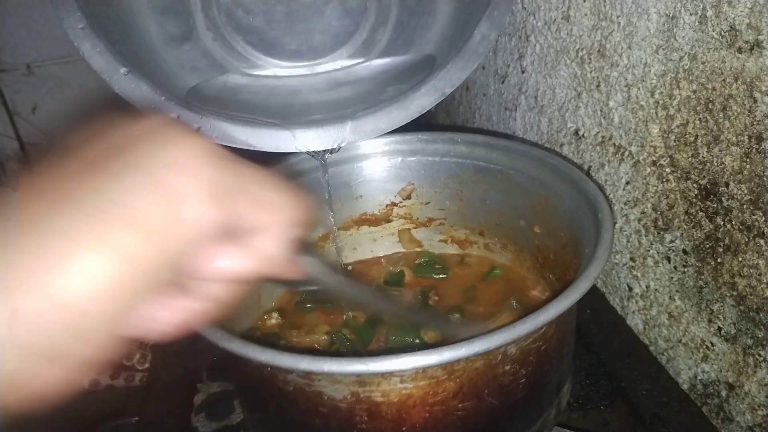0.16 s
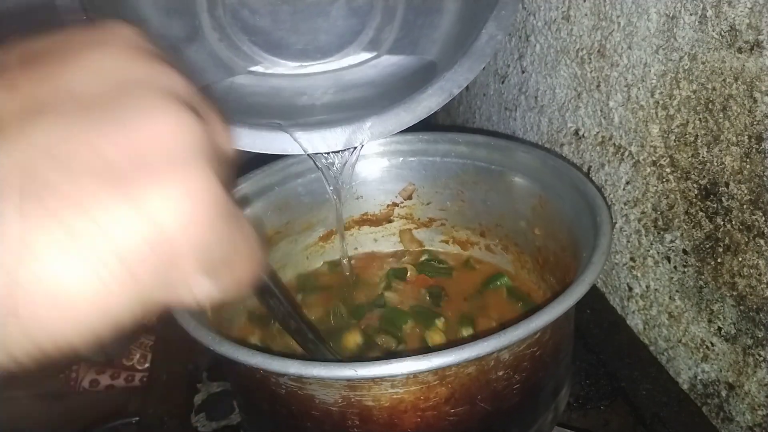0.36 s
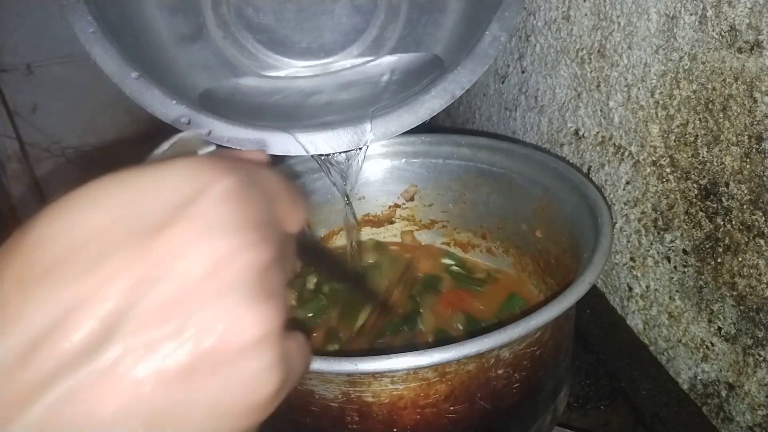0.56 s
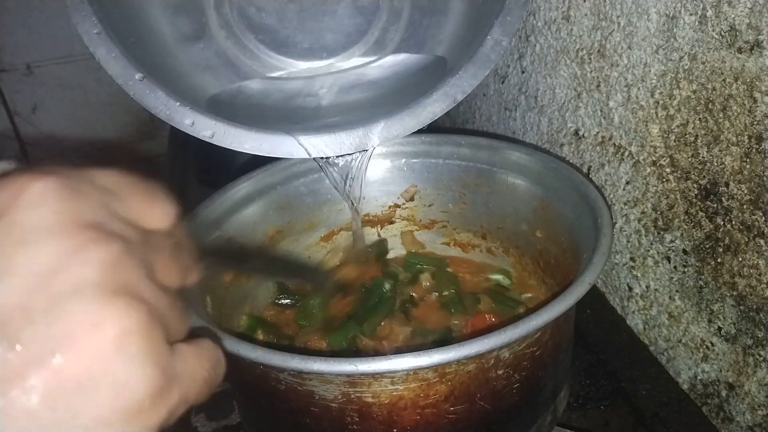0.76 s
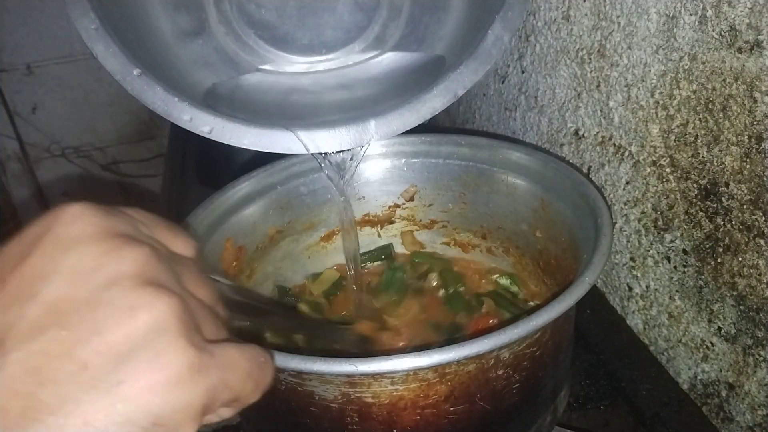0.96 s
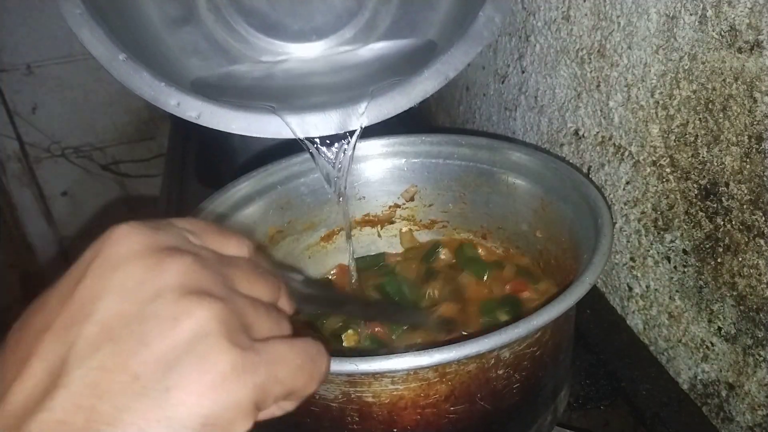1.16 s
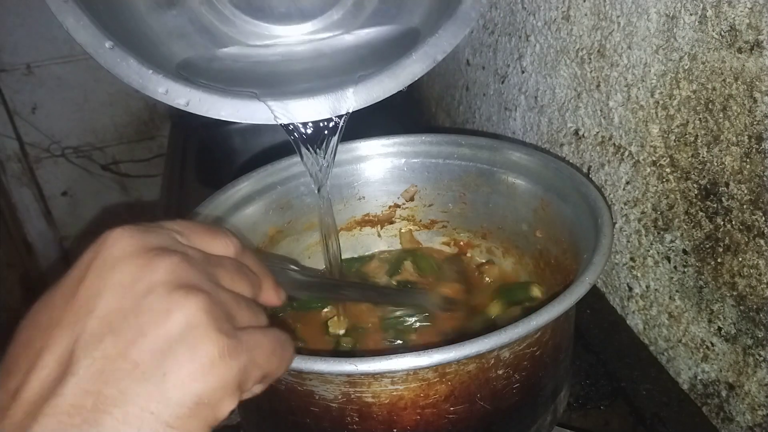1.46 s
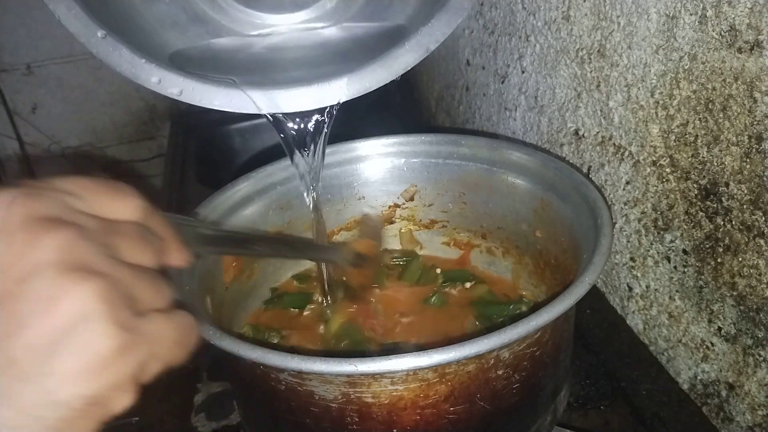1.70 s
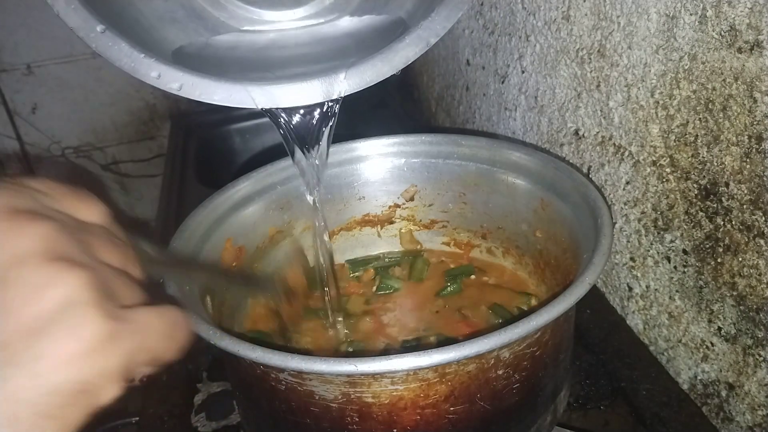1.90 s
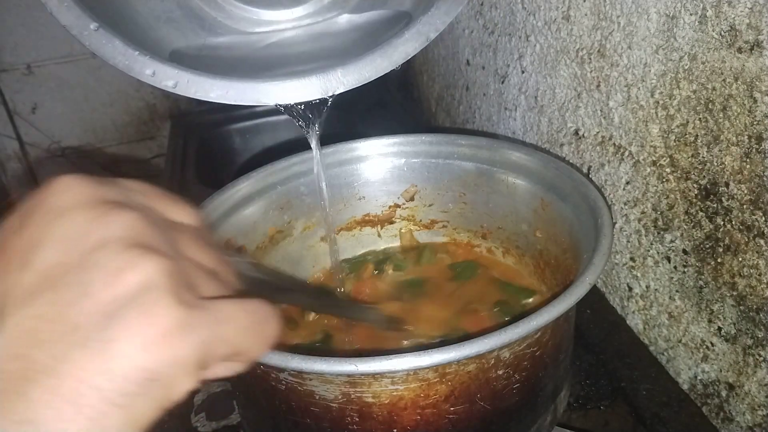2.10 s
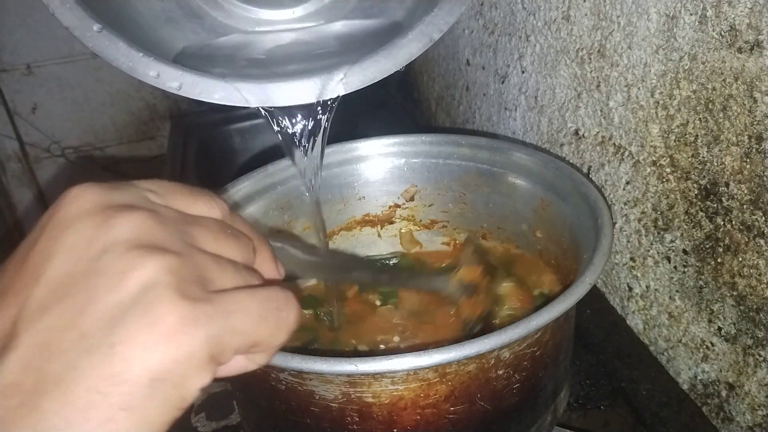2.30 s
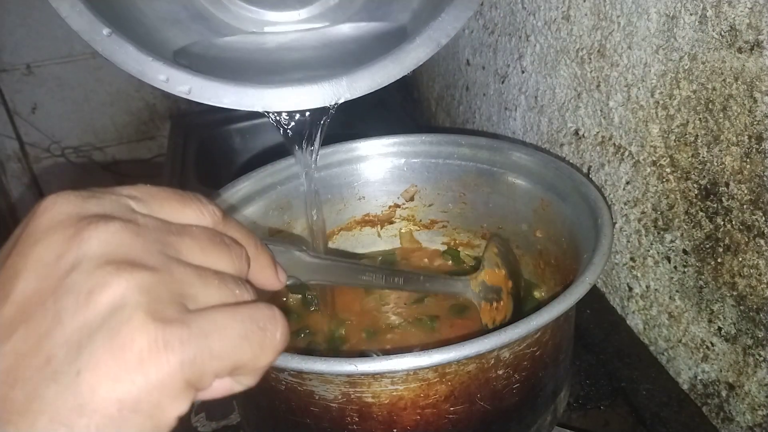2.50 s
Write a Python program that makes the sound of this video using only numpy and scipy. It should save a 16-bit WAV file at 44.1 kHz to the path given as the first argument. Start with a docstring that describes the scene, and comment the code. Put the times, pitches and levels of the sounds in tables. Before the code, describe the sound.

Water pours into a metal pot of curry, close up in a small kitchen. Small splashes lead to a sharp ringing spoon clank at 0.23 seconds, with scraping and a heavy splash until 0.45. Drips and slosh continue; a softer knock and low glug come at 1.14. It quietens around 1.5-1.9, then bright drops and splashes return from 2.0, gurgling near 2.3, over faint fluctuating hum.

```python
"""Stirring a pot of curry

Water runs from a steel bowl into a metal pot of curry in a small kitchen, close to a phone microphone.
The spoon scrapes and knocks ringing pot modes; shaped noise makes the stream's spray and slosh.
Rising damped sines are the bubbles, loud drops and lower air pockets.
A low hum comes and goes over rumble and kitchen air; a short noise tail answers the pot and water.
"""
import sys
import numpy as np
from scipy import signal
from scipy.fft import rfft, irfft, next_fast_len
from scipy.io import wavfile
from scipy.ndimage import uniform_filter1d, map_coordinates

SR = 44100
rng = np.random.default_rng(int(sys.argv[2]) if len(sys.argv) > 2 else 0)


def store_wav(level_fs):
    """Save 16-bit WAV to argv[1]."""
    pcm = np.round(np.clip(np.atleast_2d(level_fs), -1, 1) * 32767)
    wavfile.write(sys.argv[1], SR, pcm.T.astype(np.int16))


N = 116865

# Steady sounds between the events: time_s, spoon_drag_db, curry_slosh_db, stream_spray_db
STEADY = [(0, -33, -86, -45.5), (.08, -52.5, -54, -55.5), (.3, -25.5, -47.5, -47), (.5, -37, -46, -35),
          (.7, -47, -81, -64.5), (.92, -65.5, -59, -55), (1.1, -58, -54.5, -72), (1.25, -32, -45.5, -40.5),
          (1.4, -66, -62.5, -54.5), (1.8, -61, -64, -59), (1.95, -71, -66, -51.5), (2.2, -69, -53.5, -52.5),
          (2.45, -49, -52.5, -45), (2.65, -92, -64.5, -61)]
# Resonances of the metal pot: pitch_hz, level_db, t60_s
POT_MODES = [(171, -21.5, 1), (281.9, -12.5, 0.32), (391.7, -13, 0.5), (488.7, -6.5, 0.4), (526, -4, 0.27),
             (578.7, -8, 0.35), (709, -15.5, 0.17), (1078, -7.5, 0.1), (1535, -12, 0.094),
             (1774, -13, 0.12), (2273, -5.5, 0.092), (2673, -11.5, .11), (3240, -4.5, 0.058),
             (3560, -3, 0.037)]
# Relative spectrum of the spray: frequency_hz, level_db (per Hz)
SPRAY_TONE = [(1470, -64), (2500, -8.5), (5750, -0.5), (7240, 5), (7680, 3), (8240, -21.5), (10700, -52),
              (18100, -120)]
BUBBLE_RISE = 0.13  # pitch rise over a bubble's life, as a fraction of its pitch


def amp(db):
    """Amplitude ratio of a level in dB."""
    return 10 ** (np.asarray(db) / 20)


def unit(x):
    """x scaled to rms 1."""
    return x / np.sqrt(np.mean(x ** 2) + 1e-20)


def along(points, hz):
    """Values at hz, from (frequency, value) points joined on a log axis."""
    f, v = np.transpose(points)
    return np.interp(np.log(hz + 1), np.log(f + 1), v)


def curves(rows):
    """One value per sample for each column after the time."""
    s, *columns = np.transpose(rows)
    return [np.interp(np.arange(N) / SR, s, column) for column in columns]


def wobble(rate):
    """A smooth random curve with rate knots a second."""
    knots = rng.standard_normal(int(N * rate / SR) + 4)
    return map_coordinates(knots, [np.arange(N) * rate / SR])


def filtered(x, response):
    """x with its spectrum multiplied by a complex response of frequency."""
    m = next_fast_len(N + SR // 2)
    return irfft(rfft(x, m) * response(np.fft.rfftfreq(m, 1 / SR)), m)[..., :N]


def rush(spectrum, patchy_db):
    """Coloured noise of rms 1, with random gain in patches of time and frequency."""
    z = signal.stft(rng.standard_normal(N + 512), nperseg=256)[2]
    patches = uniform_filter1d(rng.standard_normal(z.shape), size=4, axis=0)  # over frequency
    patches = uniform_filter1d(patches, size=6, axis=1)  # over time
    noise = signal.istft(z * amp(patchy_db * unit(patches)), nperseg=256)[1][:N]
    return unit(filtered(noise, lambda hz: amp(along(spectrum, hz))))


def bubbles(s, db, hz, cycles, rise, size=900):
    """Damped sines whose pitch rises, one per bubble; each falls 30 dB in its life of some cycles."""
    onset = 0.078  # time constant of the swell, in lives
    t = np.arange(size) / SR
    life = (cycles / hz)[:, None]
    phase = 2 * np.pi * hz[:, None] * (t * (1 - rise / 4) + rise * t * t / (2 * life))
    envelope = amp(db[:, None] - 30 * t / life) * (1 - np.exp(-t / (onset * life)))
    wave = envelope * np.sin(phase)
    at = np.round(s * SR).astype(int)[:, None] + np.arange(size)
    return np.bincount(at.ravel(), wave.ravel(), N + size)[:N]


def swarm(hz, spread, cycles, size_db, count):
    """Many small bubbles at random moments, rms 1; spread is in natural-log pitch."""
    u, g = rng.random((count, 2)), rng.standard_normal((count, 2))
    pitch = np.clip(hz * np.exp(spread * g[:, 0]), 300, 7800)
    level_db = np.minimum(-size_db * np.log(u[:, 1]), 12)
    ring_cycles = cycles * np.exp(0.27 * g[:, 1])
    return unit(bubbles(u[:, 0] * N / SR, level_db, pitch, ring_cycles, BUBBLE_RISE, size=500))


def spoon_drag():
    """Gritty noise from the dragging spoon keeps the pot's lower modes alive."""
    width_hz = 78
    hz, level_db, _ = np.transpose(POT_MODES)[:, :, None]

    def body(f):
        resonance = 1j * f * width_hz / (hz * hz - f * f + 1j * f * width_hz)
        return (amp(level_db) * resonance * (hz < 910)).sum(0)

    grit = amp(3.5 * wobble(55)) * rng.standard_normal(N)
    drag_db, _, _ = curves(STEADY)
    return amp(drag_db) * unit(filtered(grit, body))


def hum():
    """A slightly unsteady low sine comes and goes, and a low rumble follows its level."""
    # Level of the hum: time_s, level_db
    hum_level = [(0.0, -38), (0.05, -46), (0.21, -39.5), (0.28, -77.5), (0.32, -44), (0.45, -54),
                 (0.49, -44.5), (0.65, -45.5), (0.68, -53.5), (0.84, -42), (0.95, -68), (1.01, -45.5),
                 (1.33, -46.5), (1.39, -59.5), (1.51, -50), (1.59, -67.5), (1.64, -44.5), (1.76, -42),
                 (1.79, -56.5), (2.0, -46.5), (2.04, -59), (2.18, -46), (2.26, -71.5), (2.29, -52.5),
                 (2.41, -42.5), (2.5, -61), (2.62, -48), (2.65, -58.5)]
    # Relative spectrum of the rumble: frequency_hz, level_db (per Hz)
    rumble_tone = [(15, -75.5), (25, -19.5), (108, 1), (173, -4.5), (200, -19), (260, -33), (440, -120)]
    pitch_hz, wander_hz = 115.6, 0.93
    tone = np.sqrt(2) * np.sin(2 * np.pi * np.cumsum(pitch_hz + wander_hz * wobble(5.7)) / SR)
    level_db, = curves(hum_level)
    rumble_db = -65 + 2.1 * (level_db - level_db.mean())
    return amp(level_db) * tone + amp(rumble_db) * rush(rumble_tone, patchy_db=4.5)


def kitchen_air():
    """Quiet coloured noise of the kitchen, slowly unsteady in level."""
    # Relative spectrum of the air: frequency_hz, level_db (per Hz)
    air_tone = [(15, -52.5), (25, -38.5), (58, -2), (118, -11), (178, -5), (531, -15.5), (1300, -40.5),
                (7120, -39.5), (8240, -21.5), (10700, -68.5), (18100, -120)]
    return amp(-58.5 + 3.2 * wobble(5.9)) * rush(air_tone, patchy_db=0.5)


def stream():
    """Spray and slosh: patchy noise carrying swarms of bubbles, swollen by splashes over low churn."""
    # Relative spectrum of the slosh: frequency_hz, level_db (per Hz)
    slosh_tone = [(410, -14.5), (700, -10), (1200, -6), (1320, -11), (1720, -2), (5000, -8), (6500, -44.5),
                  (11000, -120)]
    splash_spray, splash_slosh, churn = splashes()
    _, slosh_db, spray_db = curves(STEADY)
    spray_gain = (splash_spray + amp(spray_db)) * amp(1.73 * wobble(41.05))
    slosh_gain = (splash_slosh + amp(slosh_db)) * amp(1.66 * wobble(45))

    fizz = swarm(hz=5940, spread=0.31, cycles=8.9, size_db=4, count=2500)
    gurgle = swarm(hz=2500, spread=0.352, cycles=11.9, size_db=1, count=1200)
    spray = (rush(SPRAY_TONE, patchy_db=3.5) + amp(-1.5) * fizz) / np.sqrt(2)
    slosh = rush(slosh_tone, patchy_db=5.0) + amp(1) * gurgle
    slosh = unit(filtered(slosh, pot_wall))
    return spray_gain * spray + slosh_gain * slosh + churn


def pot_wall(f):
    """Response of the pot's upper modes, added to the direct sound."""
    width_hz, boost_db = 110, 15
    hz, level_db, _ = np.transpose(POT_MODES)[:, 7:, None]
    resonance = 1j * f * width_hz / (hz * hz - f * f + 1j * f * width_hz)
    return 1 + (amp(level_db + boost_db) * resonance).sum(0)


def splashes():
    """Stream meets spoon: one attack-sag-release shape drives spray gain, slosh gain and lumpy churn."""
    # Splashes: start_s, length_s, spray_db, slosh_db, churn_db, churn_pitch_hz, sag_db (over the length)
    bursts = [(.085, .07, -57, -57.5, -44.5, 400, 2.5), (.158, .065, -38, -36, -34, 230, 8),
              (0.227, 0.22, -26, -23.5, -26, 515, 14.5), (.485, .068, -38.5, -30, -36.5, 400, 5),
              (.59, .13, -45.5, -43.5, -34.5, 330, 5.5), (.74, .18, -56, -52, -45.5, 290, 5.5),
              (.95, .04, -46.5, -64, -67, 500, 3), (1.027, .095, -43.5, -52, -53, 500, 8.5),
              (1.138, 0.22, -30.5, -32.5, -38, 550, 21), (1.4, .1, -71, -62, -62, 450, 5),
              (1.612, .05, -55, -51, -52, 500, 12), (1.66, .12, -72, -61, -47, 300, 4),
              (1.878, 0.088, -48.5, -56, -58, 560, 3), (1.988, .1, -32, -50, -52, 300, 9),
              (2.1, .095, -34, -40.5, -50, 600, 13.5), (2.25, 0.061, -38, -44.5, -47.5, 640, 3),
              (2.318, 0.099, -36, -50, -47.5, 560, 1), (2.566, .09, -42.5, -58.5, -53.5, 500, 2)]
    attack_s, release_s, churn_octaves = 0.0063, 0.013, 0.44
    t, spray, slosh, churn = np.arange(N) / SR, 0, 0, 0
    for s, length, spray_db, slosh_db, churn_db, hz, sag_db in bursts:
        u = t - s
        attack = np.clip(u / attack_s, 0, 1)
        sag = amp(-sag_db * np.clip(u / length, 0, 1))
        release = np.exp(-np.maximum(u - length, 0) / release_s)
        shape = attack * sag * release
        band = lambda f: np.exp(-(np.log2((f + 1) / hz) / churn_octaves) ** 2)
        lumps = unit(filtered(amp(5.9 * wobble(52)) * rng.standard_normal(N), band))
        spray = spray + amp(spray_db) * shape
        slosh = slosh + amp(slosh_db) * shape
        churn = churn + amp(churn_db) * shape * lumps
    return spray, slosh, churn


def loud_drops():
    """Each loud drop spits a short burst of spray and rings as a bubble of rising pitch."""
    # Loud bubbles and drops: start_s, level_db, pitch_hz, spit_db (over the usual share of spray)
    drops = [(0.0886, -25.5, 6890, 1), (0.1302, -27, 2650, 0.5), (0.3439, -12, 5730, 6.5),
             (0.3694, -16.5, 3670, 6.5), (0.4934, -19, 1547, -0.5), (0.598, -24, 6710, 1),
             (0.6681, -24, 6670, -10), (0.696, -23.5, 4620, -3), (0.7662, -25, 5420, -3),
             (0.838, -14.5, 2780, -13.5), (0.9486, -33, 6700, -7), (0.9566, -26, 4850, -1),
             (1.006, -31, 2630, -17), (1.0282, -19.5, 2840, -8.5), (1.067, -22.5, 8000, 1.5),
             (1.1068, -32, 2400, -8), (1.3002, -18, 6520, -1.5), (1.4066, -22, 7440, -17),
             (1.4465, -25, 6900, -15), (1.4696, -31, 7290, -2), (1.6148, -22.5, 6000, -5.5),
             (1.734, -39, 3840, 5), (1.8158, -36.5, 6100, -2), (1.8407, -34.5, 3930, -10),
             (1.8791, -25, 3740, -20), (1.889, -32.5, 5150, -22), (1.9121, -29.5, 4300, -0.5),
             (1.9275, -28, 6110, -3), (1.9958, -21, 6380, -23), (2.0162, -12, 5530, -13),
             (2.0522, -22, 5670, 10), (2.105, -30, 3950, -13), (2.1166, -40, 5700, 19.5),
             (2.2394, -24.5, 7840, 1), (2.2553, -20, 2350, 3), (2.342, -18, 5380, -4),
             (2.3755, -10, 6230, -6), (2.3893, -16, 2670, -1), (2.527, -27, 5860, -22),
             (2.569, -37, 5600, -12), (2.581, -28, 4470, 1)]
    usual_spit_db, spit_t60_s = -2.5, 0.021
    s, level_db, hz, spit_db = np.transpose(drops)
    t = np.arange(2000) / SR
    hits = np.zeros(N)
    hits[np.round(s * SR).astype(int)] = amp(level_db + spit_db + usual_spit_db)
    spit_shape = amp(-60 * t / spit_t60_s) * (1 - np.exp(-t / 0.001))
    spit = np.convolve(hits, spit_shape)[:N] * rush(SPRAY_TONE, patchy_db=4)
    cycles = 28.3 * np.sqrt(hz / 4100)  # higher drops ring for more cycles
    return spit + bubbles(s, level_db, hz, cycles, BUBBLE_RISE)


def air_pockets():
    """Large air pockets in the curry glug as low damped sines with a slight rise."""
    # Air pockets: start_s, level_db, pitch_hz
    pockets = [(.16, -29, 224), (.605, -26.5, 323.5), (0.688, -40, 278), (1.145, -14, 720),
               (1.22, -22.5, 640), (1.691, -35, 346), (2.258, -25.5, 632), (2.287, -26, 620),
               (2.303, -21, 610), (2.355, -22, 610), (2.388, -26, 590), (2.41, -34, 510)]
    return bubbles(*np.transpose(pockets), cycles=9, rise=0.025, size=4000)


def spoon_knocks():
    """Each knock cracks and rings the pot's modes, tuned by where the spoon damps it."""
    # Spoon against pot: start_s, level_db, brightness_db_per_octave (above 500 Hz), pitch_ratio
    knocks = [(0.2306, -9.5, 1, 1.008), (.2575, -18.5, -10.5, 1), (.489, -41, 6, .999),
              (1.1339, -21, -1.5, 0.8)]
    crack_db, crack_t60_s = 2, 0.056
    out, t = np.zeros(N + SR), np.arange(SR // 2) / SR
    hz, level_db, t60 = np.transpose(POT_MODES)[:, :, None]
    for s, knock_db, bright, ratio in knocks:
        tilt_db = bright * np.log2(np.maximum(hz / 500, 1))
        uneven_db = rng.normal(0, 1.28, hz.shape)  # no two knocks excite the modes alike
        gain = amp(level_db + tilt_db + uneven_db - 60 * t / t60)
        ring = (gain * np.sin(2 * np.pi * hz * ratio * t)).sum(0) * (1 - np.exp(-t / 0.00086))
        crack_noise = np.diff(rng.standard_normal(len(t) + 1))  # treble-heavy
        crack = amp(crack_db + 0.68 * bright - 60 * t / crack_t60_s) * crack_noise
        out[round(s * SR):][:len(t)] += amp(knock_db) * (ring + crack)
    return out[:N]


def walls(x):
    """Short answer of the pot's hollow and the tiled corner: a delayed, decaying noise tail."""
    t60_s = 0.2
    t = np.arange(SR // 3) / SR
    tail = rng.standard_normal(len(t)) * amp(-60 * t / t60_s)
    delayed = np.pad(x, (150, 0))  # 150 samples, 3.4 ms
    return signal.fftconvolve(delayed, tail / np.linalg.norm(tail))[:N]


def scene():
    """Spoon and water near the microphone with their reflections, over hum and kitchen air."""
    spoon = spoon_drag() + spoon_knocks()
    water = stream() + loud_drops() + air_pockets()
    near = spoon + water
    return (near + amp(-6) * walls(near) + hum() + kitchen_air())[None]


def record(dry):
    """The phone microphone shapes bass and treble and keeps nothing above its band limit."""
    # Microphone response: frequency_hz, level_db
    mic = [(30, -18), (91, -2.5), (151, 0.7), (7410, -2.56), (8010, -11.5), (8410, -21)]
    top_hz = 8450
    return filtered(dry, lambda hz: amp(along(mic, hz)) * (hz < top_hz))


dry = scene()
out = record(dry)
store_wav(out)
```